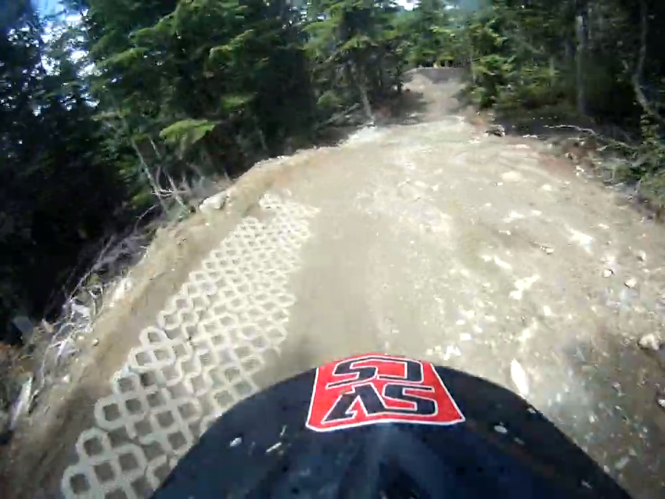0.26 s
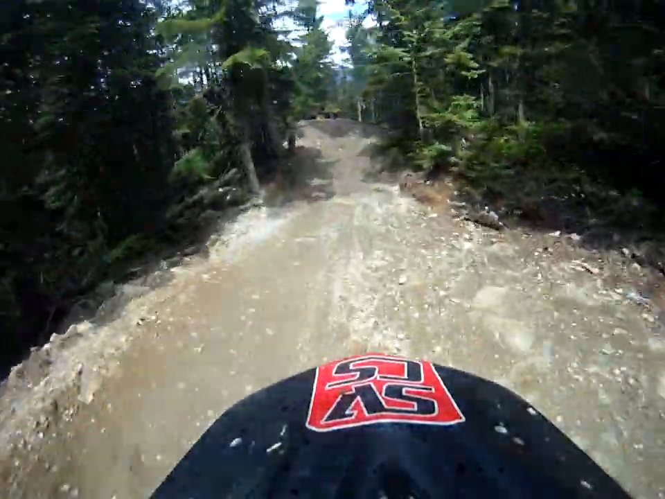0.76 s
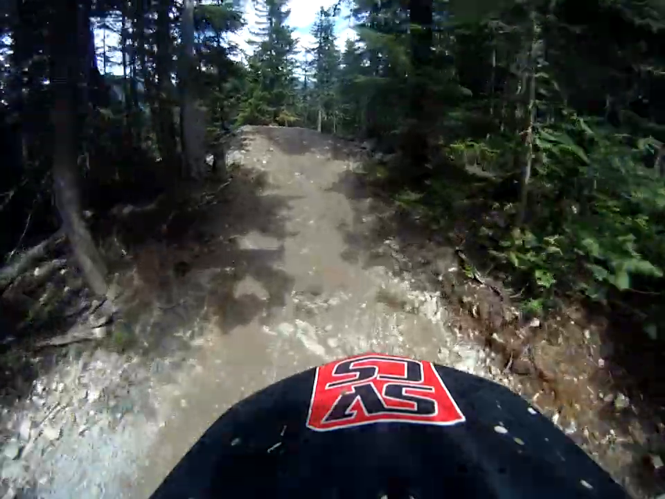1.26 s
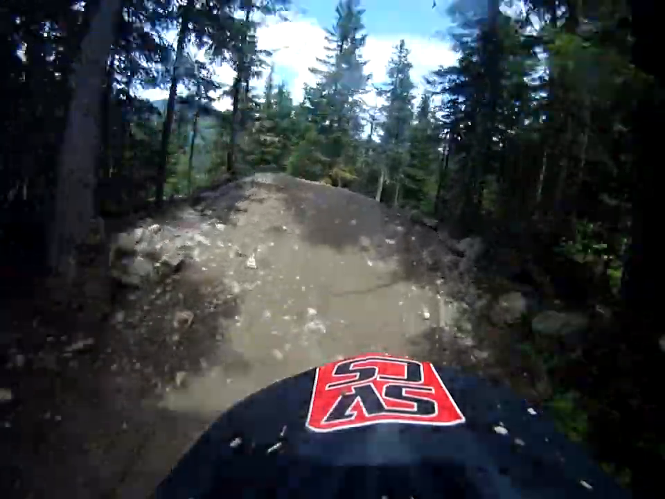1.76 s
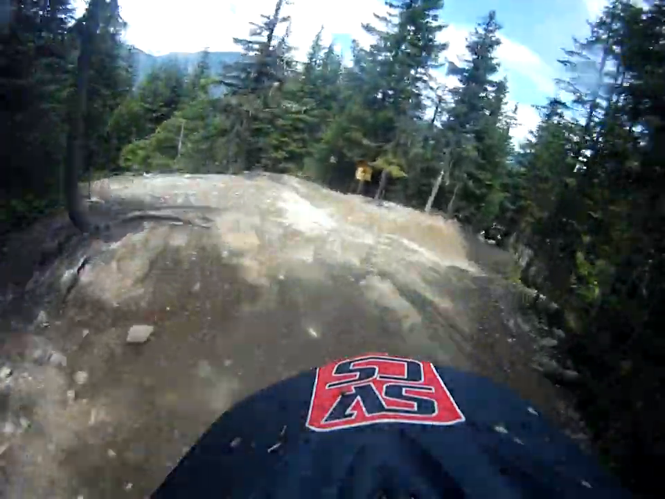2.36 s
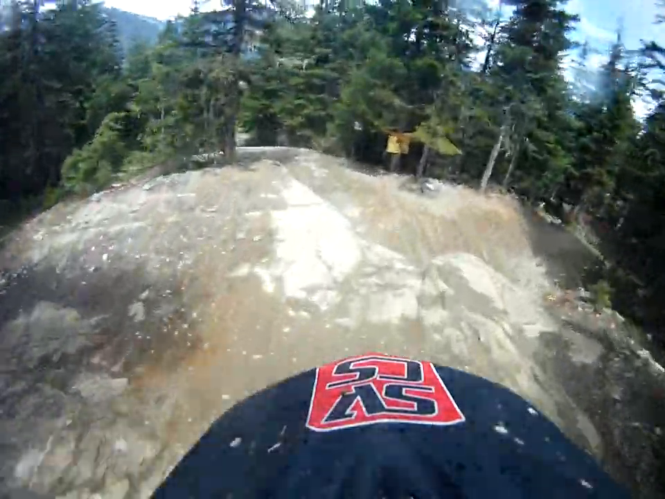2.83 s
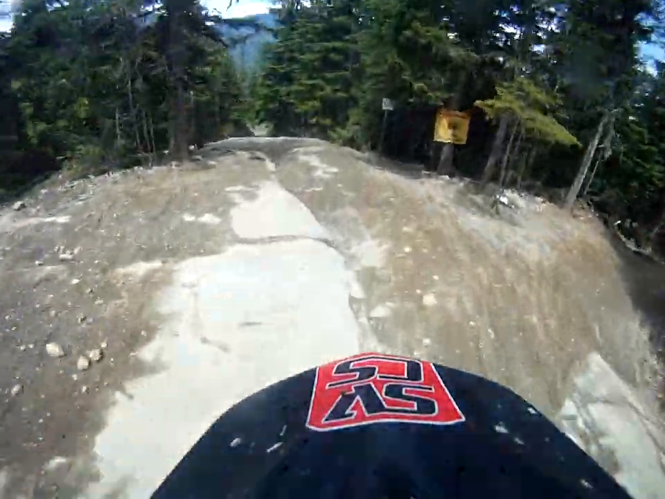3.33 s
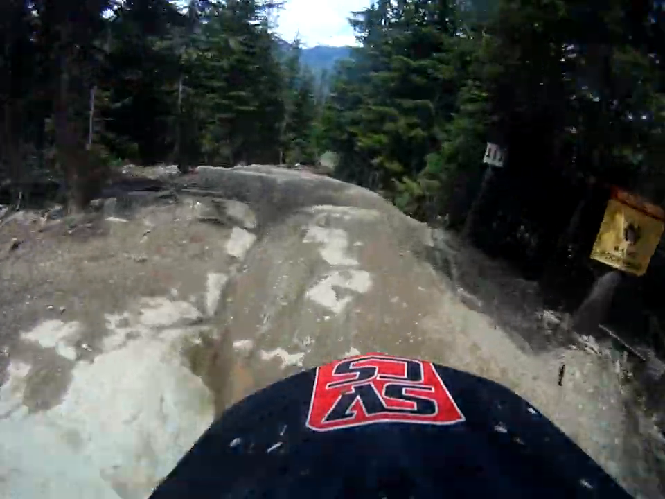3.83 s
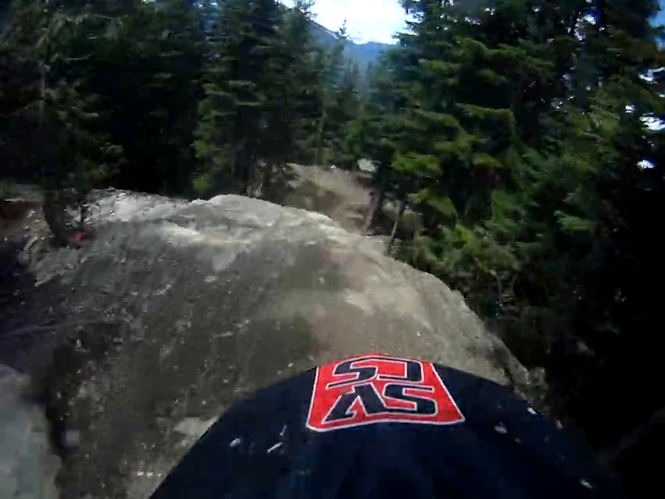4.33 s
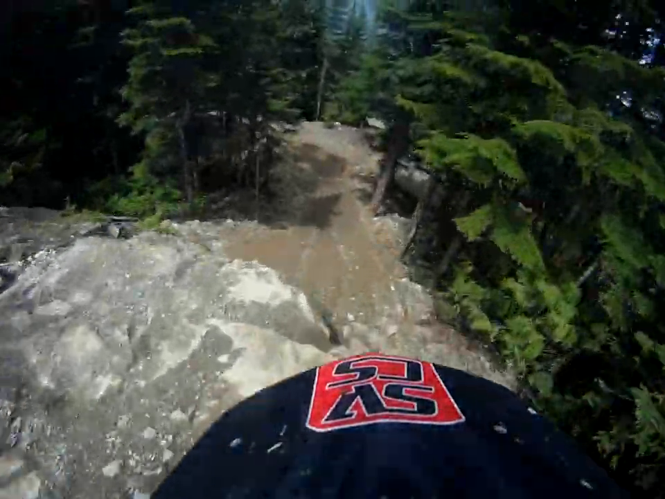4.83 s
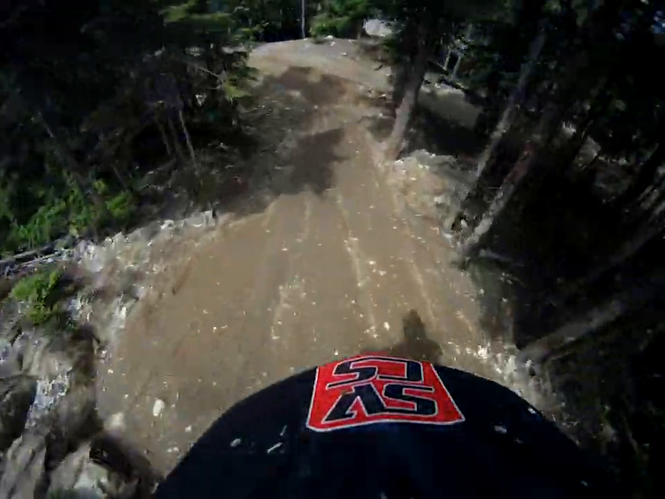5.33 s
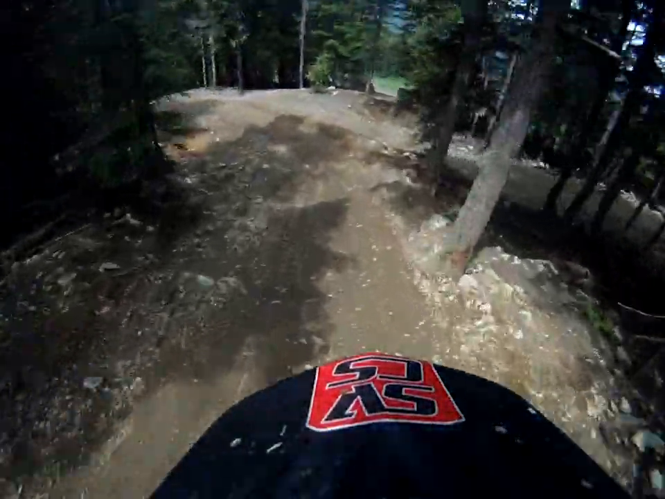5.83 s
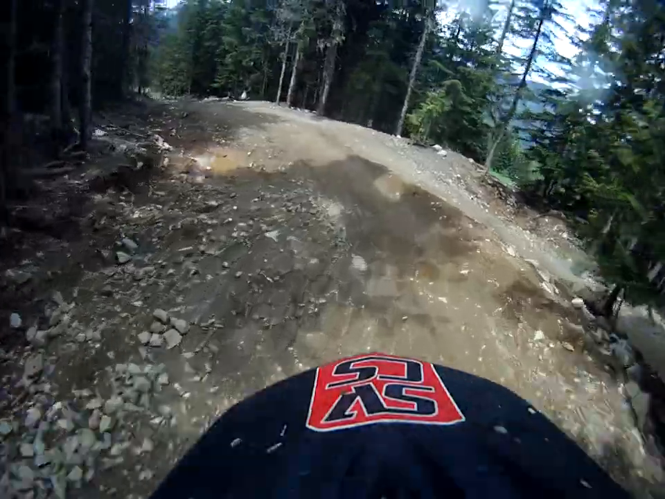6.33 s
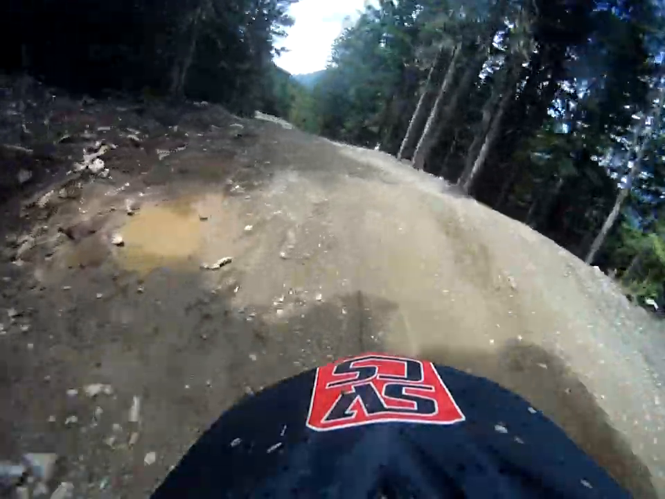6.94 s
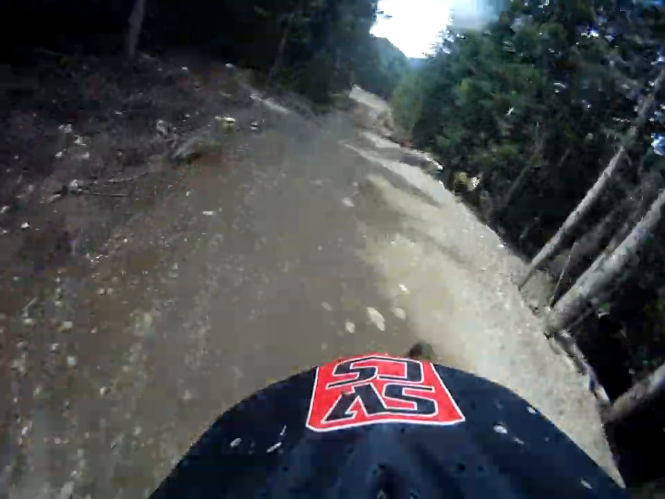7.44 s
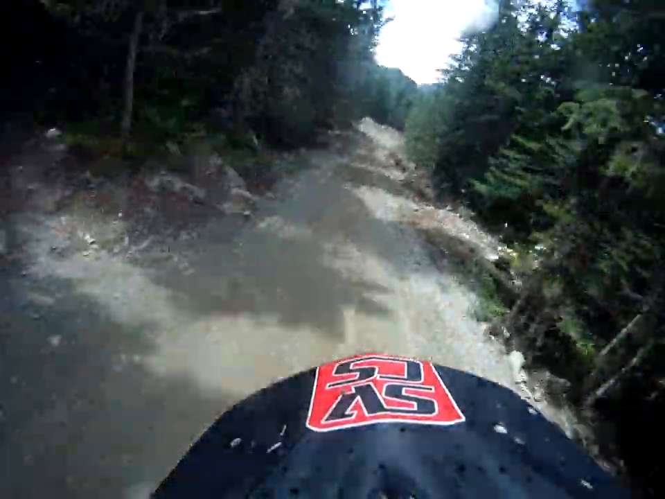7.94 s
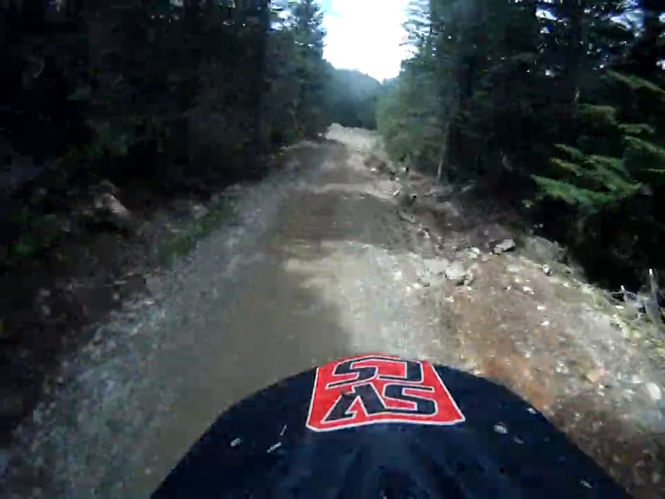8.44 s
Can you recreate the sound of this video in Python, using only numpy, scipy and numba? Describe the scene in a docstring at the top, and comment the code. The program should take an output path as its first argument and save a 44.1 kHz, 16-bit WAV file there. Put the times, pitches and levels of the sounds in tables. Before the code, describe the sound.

Close helmet microphone on a mountain bike descending a forest trail. Low wind rumble with quick puffs runs throughout, over gritty tyre hiss and gravel crunch. Chain and frame rattle, with a hard clack near two seconds and a cluster past three and a half. The wind dips, then surges after five and a half seconds; a brief brake squeal follows, then roaring air and hissing dirt.

```python
"""Wind rumbles and gravel crunches from the start, with knocks of chain and frame: a mountain bike on a trail.
The point of hearing is a camera on the rider's helmet. Wind and tyres are coloured noise led by one airflow curve.
Gravel is ringing clicks, knocks are contacts that ring the bike, and a brake squeals once as a gliding tone.
The camera's limiter ducks loud peaks; slow, held samples add a gritty treble."""
import sys
import numpy as np
from scipy import signal
from scipy.fft import rfft, irfft, next_fast_len
from scipy.io import wavfile
from scipy.ndimage import uniform_filter1d
from numba import njit

SR = 44100
rng = np.random.default_rng(int(sys.argv[2]) if len(sys.argv) > 2 else 0)


def inscribe(sig):
    """Save sig as 16-bit PCM at rate SR to the path in sys.argv[1].

    A 1-D sig is mono; a 2-D sig holds one channel per row.
    Samples are clipped to [-1, 1] before scaling.
    """
    pcm = np.round(np.clip(np.atleast_2d(sig).T, -1, 1) * 32767)
    wavfile.write(sys.argv[1], SR, pcm.astype(np.int16))


N = 383229  # length in samples

# Airflow on the helmet, following the speed of the ride: t/s, level/dB
AIRFLOW = [(0.0, -21.5), (0.2, -21), (0.6, -23), (1.5, -18), (1.92, -18.0), (2.12, -23), (2.45, -22.5),
           (2.88, -31), (3.2, -18.5), (3.62, -19.5), (3.85, -23.5), (4.5, -26.0), (5.03, -25.0),
           (5.28, -29), (5.6, -16.5), (6.7, -16), (7.95, -19.5), (8.69, -14)]
# Noise spectrum of the helmet wake's slow flutter: f/Hz, relative level per Hz/dB
FLUTTER_SPECTRUM = [(10, -15), (22, 3), (37, 17), (48, 14), (62, -25), (110, -44.5)]
# Noise spectrum of big eddies rumbling on the microphone: f/Hz, relative level per Hz/dB
RUMBLE_SPECTRUM = [(36, -22), (58, 1.5), (75, 0.5), (145, -1.84), (200, -6.5), (280, -17.5), (450, -52.5)]
# Noise spectrum of small eddies rushing past: f/Hz, relative level per Hz/dB
RUSH_SPECTRUM = [(110, -55), (180, -7), (250, -0.5), (350, -2.5), (480, -4.5), (600, -10), (760, -20.5),
                 (1000, -28), (1600, -35.5), (3000, -48)]
# Single big eddies slapping the microphone: t/s, level/dB
BUFFETS = [(1.307, -1), (1.531, -2), (1.965, -3), (2.29, 0), (5.797, 2), (5.936, 1), (6.829, -2),
           (7.149, 0), (7.471, 1), (7.583, 1), (7.845, -1), (7.937, -0.5)]
# Brake disc: t/s, f/Hz, level/dB, octave level/dB
BRAKE_SQUEAL = [(6.565, 2340, -60, -80), (6.588, 2420, -40, -70), (6.625, 2510, -37, -66),
                (6.66, 2440, -39, -61), (6.69, 2335, -52, -52), (6.725, 2290, -58, -56),
                (6.76, 2180, -70, -70)]
# Filter spectrum of the tyres' rolling noise and the gravel: f/Hz, relative level/dB
ROLLING_SPECTRUM = [(400, 9.5), (800, 4), (1250, 3.5), (1600, -1), (2200, 2), (2900, 4.5), (3400, -1.5),
                    (4000, -6), (5000, -10), (5800, -62)]
# Stony ground under the wheels; overlaps add up: start t/s, end t/s, extra crunch level/dB
STONY_GROUND = [(-0.05, 0.85, 7), (1.68, 1.96, 7.5), (2.06, 2.68, 5), (3.38, 4.2, 8.5), (3.53, 3.72, 4),
                (4.85, 5.27, 6.5), (5.03, 5.16, 10)]
# Tyres biting into packed dirt in dips and bends: start t/s, end t/s, extra hiss level/dB
DIRT_BITES = [(5.59, 5.77, 4.5), (6.05, 6.72, 3), (6.25, 6.47, 4.5), (6.9, 7.2, 3), (7.26, 7.56, 6.5),
              (7.6, 7.8, 0.5), (8.13, 8.75, 6.5)]
# Stones and bumps shaking the bike: t/s, level/dB, struck part f/Hz, struck part against whole bike level/dB
KNOCKS = [(0.077, -31.5, 1720, 5), (0.238, -30, 2315, 3), (0.703, -30, 2140, 6), (1.178, -34.5, 3180, 4),
          (1.27, -30.5, 3210, 8), (1.345, -34.5, 2670, -1), (1.581, -34.5, 2800, 2),
          (1.666, -31.5, 2400, 19), (1.745, -28.5, 3230, -1), (1.772, -33, 1260, 3),
          (1.93, -21.5, 1195, -4), (1.942, -27.5, 1060, -1), (2.573, -35, 2720, 6), (3.112, -30, 1206, -4),
          (3.396, -35, 2430, -3), (3.423, -30.5, 2650, -10), (3.555, -23.5, 2860, -3),
          (3.59, -28, 2670, -2), (3.622, -24.5, 2650, 3), (3.682, -21, 2880, 6), (3.695, -27.5, 3050, -2),
          (3.766, -27, 1744, 8), (3.855, -33.5, 1890, 18), (3.991, -36, 2200, 1), (4.037, -28, 2218, -4),
          (4.399, -33, 2850, 6), (4.947, -30.5, 2980, 2), (5, -33, 2250, 3), (5.035, -22.5, 2860, -1),
          (5.068, -30, 2810, -4), (5.208, -36, 2444, 3), (5.255, -31.5, 2760, -13), (6.277, -25, 2230, 2)]
# Resonances of frame, chain and guard: f/Hz, width/Hz, relative level/dB
BIKE_RESONANCES = [(1260, 130, 5), (1603, 90, 13), (2150, 92, 10), (2530, 106, 13), (2900, 210, 9.5),
                   (3490, 120, 6), (3300, 99, -15), (4200, 320, 0), (4700, 240, -26)]
# A few blows that ring through the suspension: t/s, level/dB
THUMPS = [(.078, -32), (.239, -28), (1.931, -23), (3.855, -28)]
# Ringing of the fork under those blows: f/Hz, relative level/dB, time to fall 60 dB/s
FORK_MODES = [(640, 8.5, 0.047), (850, 4.5, 0.021), (1076, -4, 0.051), (1230, -13, 0.058)]

CRUISE_DB = -20  # airflow level at which the layer levels below hold
# each layer's level in dB at cruising airflow, and the dB it gains for each dB more
WAKE_DB, WAKE_GROWTH = -26.5, 0.73
RUMBLE_DB, RUMBLE_GROWTH = -19.5, 0.96
RUSH_DB, RUSH_GROWTH = -25, 0.75
HISS_DB, HISS_GROWTH = -45, 0.87
CRUNCH_DB, CRUNCH_GROWTH = -52.5, 0.59
STONY_EDGE_S, BITE_EDGE_S = 0.032, 0.036  # time to run onto and off a stretch
STONY_HISS_SHARE, BITE_ROAR_SHARE = 0.59, 0.21  # stones also raise the hiss; a bite also swells the rush
CHATTER_S, CHATTER_GROWTH_S_PER_DB, TYPICAL_KNOCK_DB = 0.012, 0.0002, -30  # harder knocks chatter longer
# small rattles of chain and cables; the level is for smooth ground at cruising airflow
LOOSE_PER_S, LOOSE_DB, LOOSE_SPREAD_DB = 14, -45.5, 2
LOOSE_LOW_HZ, LOOSE_HIGH_HZ = 1930, 3710
CAMERA_HZ, TOP_HZ = 12000, 15350  # the camera's sample rate and its final treble cut


def undb(db):
    """Decibels to gain."""
    return 10 ** (np.asarray(db) / 20)


def unit(x):
    """Scale to rms 1."""
    return x / np.sqrt(np.mean(x ** 2) + 1e-18)


def curves(table):
    """The columns of a time table, one value a sample."""
    s, *columns = np.transpose(table)
    t = np.arange(N) / SR
    return [np.interp(t, s, column) for column in columns]


def stretches(table, edge_s):
    """Extra dB while the wheels are on each stretch: ramp on, hold, ramp off."""
    t = np.arange(N) / SR
    total_db = np.zeros(N)
    for start, end, db in table:
        inside_s = np.minimum(t - start, end - t)
        total_db += db * np.clip(0.5 + inside_s / edge_s, 0, 1)
    return total_db


def colour(x, spectrum):
    """Filter by a (Hz, dB) spectrum; rms 1."""
    size = next_fast_len(len(x))
    hz, db = np.transpose(spectrum)
    f = np.maximum(np.fft.rfftfreq(size, 1 / SR), 1)
    gain = undb(np.interp(np.log(f), np.log(hz), db))
    return unit(irfft(rfft(x, size) * gain, size)[:len(x)])


def noise(spectrum):
    """Coloured noise for the whole ride; rms 1."""
    return colour(rng.standard_normal(N), spectrum)


def resonate(x, hz, width_hz):
    """One resonance, gain 1 at its centre."""
    hz = min(hz, SR / 4)
    b, a = signal.iirpeak(hz, hz / width_hz, fs=SR)
    return signal.lfilter(b, a, x)


def walk(rate):
    """Smooth, bounded random drift of rms 1, with rate new targets a second."""
    targets = np.clip(rng.standard_normal(4096), -2, 2)
    return unit(np.interp(np.arange(N) / SR * rate, np.arange(len(targets)), targets))


def add(track, s, sound):
    """Mix a sound in at a time."""
    start = max(int(s * SR), 0)
    track[start:start + len(sound)] += sound[:N - start]


def wind(air_db, bite_db, eddies):
    """The helmet's wake flutters, big eddies rumble on the microphone, small ones rush past in quick puffs."""
    flutter_db = WAKE_DB + WAKE_GROWTH * air_db
    rumble_db = RUMBLE_DB + RUMBLE_GROWTH * air_db + 0.99 * eddies
    rush_db = RUSH_DB + RUSH_GROWTH * air_db + BITE_ROAR_SHARE * bite_db + 1.62 * eddies
    flutter = noise(FLUTTER_SPECTRUM) * undb(flutter_db)
    rumble = noise(RUMBLE_SPECTRUM) * undb(rumble_db)
    rush = noise(RUSH_SPECTRUM) * undb(rush_db)
    return flutter + rumble + rush


def buffets(width_s):
    """A passing vortex sucks at the port for a few milliseconds, with a soft push before and after."""
    out = np.zeros(N)
    t = np.arange(-SR // 40, SR // 40) / SR
    for s, db in BUFFETS:
        u = t / (width_s * np.exp(0.14 * rng.standard_normal()))  # each width varies a little
        add(out, s + t[0], undb(db) * (u ** 2 - 1) * np.exp(-u ** 2 / 2))
    return out


def brake():
    """The disc sings briefly and unsteadily; its octave gains on the fundamental as the pitch sags."""
    hz, db, octave_db = curves(BRAKE_SQUEAL)
    phase = 2 * np.pi * np.cumsum(hz * (1 + 0.007 * walk(350))) / SR
    tone = undb(db) * unit(np.sin(phase)) + undb(octave_db) * unit(np.sin(2 * phase))
    t = np.arange(N) / SR
    sounding = (t > BRAKE_SQUEAL[0][0]) * (t < BRAKE_SQUEAL[-1][0])
    return tone * undb(2 * walk(120)) * sounding


def knock(hz, decay_s, part_db):
    """A first contact and a dying chatter of small ones ring the struck part and the whole bike."""
    t = np.arange(SR // 8) / SR
    contacts = rng.standard_normal(len(t)) * (rng.random(len(t)) < 2000 / SR)  # about 2000 a second
    contacts *= np.exp(-t / max(decay_s, 1e-3))
    contacts += 0.5 * rng.standard_normal(len(t)) * np.exp(-t / 0.0025)  # first contact
    detune = 1 + 0.011 * rng.standard_normal(len(BIKE_RESONANCES))
    body = np.zeros(len(t))
    for k, (f, width, db) in enumerate(BIKE_RESONANCES):
        body += (-1) ** k * undb(db) * resonate(contacts, f * detune[k], width)  # alternating polarity
    struck_part = resonate(contacts, hz, width_hz=160)
    crack = resonate(contacts, 2900, width_hz=3900)
    sound = unit(body) + undb(part_db) * unit(struck_part) + undb(-4.0) * unit(crack)
    return sound / np.sqrt(uniform_filter1d(sound ** 2, size=176).max())  # loudest 4 ms at rms 1


def loose_parts(air_db):
    """Chain and cables tick at random, harder with speed and on stony ground."""
    out = np.zeros(N)
    shake_db = LOOSE_DB + CRUNCH_GROWTH * air_db + stretches(STONY_GROUND, STONY_EDGE_S)
    draws = rng.random((int(LOOSE_PER_S * N / SR), 3))
    for k, (when, size, pitch) in enumerate(draws):
        s = (k + when) / LOOSE_PER_S
        hz = LOOSE_LOW_HZ * (LOOSE_HIGH_HZ / LOOSE_LOW_HZ) ** pitch
        tick = knock(hz, decay_s=0.0082, part_db=0)
        add(out, s, undb(LOOSE_SPREAD_DB * (2 * size - 1)) * tick)
    return out * undb(shake_db)


def rattles():
    """Stones and bumps knock the bike; a few blows also ring the fork as decaying sines."""
    out = np.zeros(N)
    for s, db, hz, part_db in KNOCKS:
        decay_s = CHATTER_S + CHATTER_GROWTH_S_PER_DB * (db - TYPICAL_KNOCK_DB)
        add(out, s, undb(db) * knock(hz, decay_s, part_db))
    t = np.arange(SR // 6) / SR
    thump = np.zeros(len(t))
    for hz, db, t60 in FORK_MODES:
        thump += undb(db) * np.sin(2 * np.pi * hz * t) * np.exp(-np.log(1000) * t / t60)
    for s, db in THUMPS:
        add(out, s, undb(db) * thump)
    return out


def crunch(per_s, spread_db, width_hz):
    """Pebbles snap under the tread: clicks of very unequal size, ringing in nine pitch bands."""
    out = np.zeros(N)
    pitches = np.geomspace(1100, 4400, 9)
    for hz in pitches:
        gap, size, side = rng.exponential(size=(3000, 3)).T
        at = (np.cumsum(gap) * len(pitches) / per_s * SR).astype(int)
        polarity = np.sign(side - np.log(2))  # up or down with equal chance
        height = undb(spread_db * np.minimum(size, 3.5)) * polarity
        inside = at < N
        clicks = np.zeros(N)
        clicks[at[inside]] = height[inside]
        out += resonate(clicks, hz, width_hz)
    return out


def tyres(air_db, bite_db, eddies):
    """Dirt hisses under the tyres, louder with speed and grip; gravel crunches in clumps, most on stony ground."""
    stony_db = stretches(STONY_GROUND, STONY_EDGE_S)
    hiss = noise(ROLLING_SPECTRUM) * undb(0.9 * eddies + 0.9 * walk(90))
    clumps = undb(2.6 * walk(60))
    stones = colour(crunch(per_s=700, spread_db=4.0, width_hz=530) * clumps, ROLLING_SPECTRUM)
    hiss_db = HISS_DB + HISS_GROWTH * air_db + bite_db + STONY_HISS_SHARE * stony_db
    crunch_db = CRUNCH_DB + CRUNCH_GROWTH * air_db + stony_db
    return hiss * undb(hiss_db) + stones * undb(crunch_db)


def scene():
    """Wind, brake, rattles and tyres at the helmet; one airflow drives wind, tyres and loose parts."""
    air_db = curves(AIRFLOW)[0] - CRUISE_DB
    bite_db = stretches(DIRT_BITES, BITE_EDGE_S)
    eddies = walk(38)  # quick puffs of the airflow, shared by wind and hiss
    air = wind(air_db, bite_db, eddies) + buffets(width_s=0.0021)
    bike = brake() + loose_parts(air_db) + rattles() + tyres(air_db, bite_db, eddies)
    return (air + bike)[None]


@njit
def follow(x, attack, release):
    """Envelope that rises quickly and falls slowly."""
    out, e = np.empty(len(x)), 0.
    for i in range(len(x)):
        e += (abs(x[i]) - e) * (attack if abs(x[i]) > e else release)
        out[i] = e
    return out


def limit(x, top_db, attack_s, release_s):
    """Turn the gain down while the envelope is above the top; quick first swings can slip through."""
    envelope = follow(x, 1 / (attack_s * SR), 1 / (release_s * SR))
    return x / np.maximum(envelope / undb(top_db), 1)


def record(dry):
    """The camera limits, then holds each slow sample, so images mirror about its rate; the top is cut."""
    limited = limit(dry[0], top_db=-9, attack_s=0.0032, release_s=0.1)
    smooth = signal.fftconvolve(limited, signal.firwin(91, 5650, fs=SR), "same")  # low-pass, cutoff in Hz
    slow = signal.resample_poly(smooth, CAMERA_HZ, SR)
    held = signal.resample_poly(np.repeat(slow, 8), SR, 8 * CAMERA_HZ)[:N]  # 8 equal steps hold a sample
    top_cut = signal.ellip(10, 0.2, 80, TOP_HZ, fs=SR, output="sos")
    return signal.sosfilt(top_cut, held)[None]


dry = scene()
out = record(dry)
inscribe(out)
```